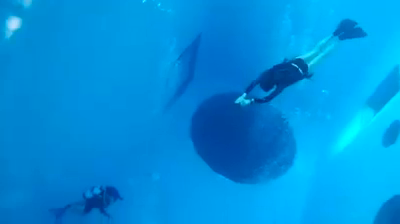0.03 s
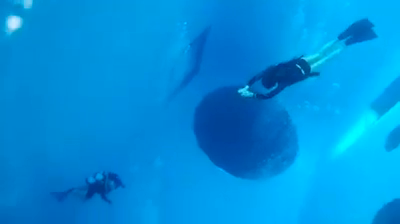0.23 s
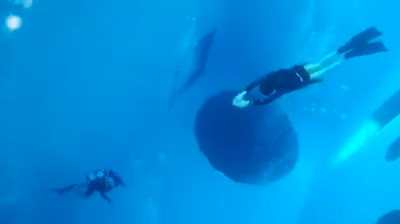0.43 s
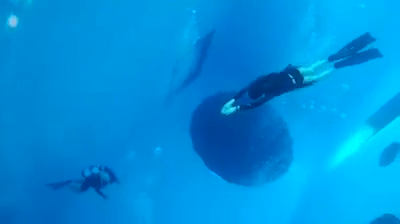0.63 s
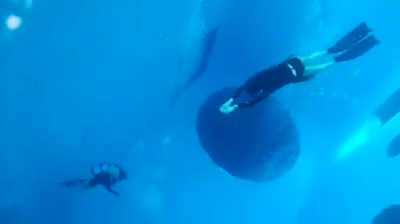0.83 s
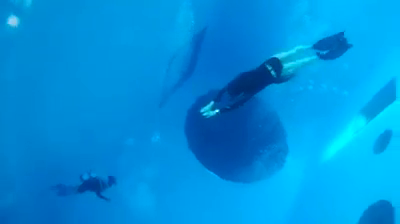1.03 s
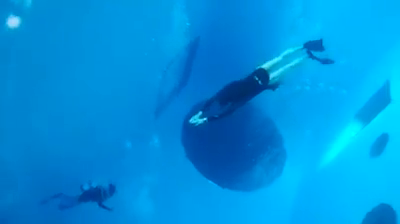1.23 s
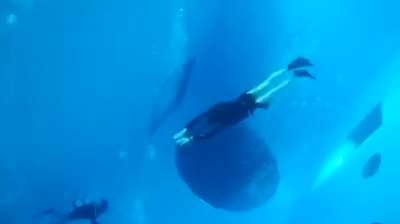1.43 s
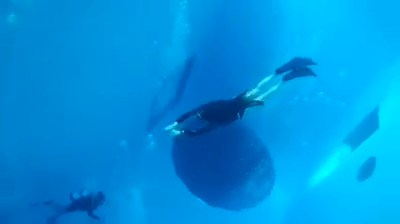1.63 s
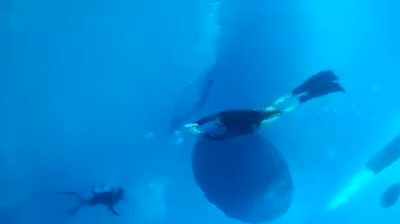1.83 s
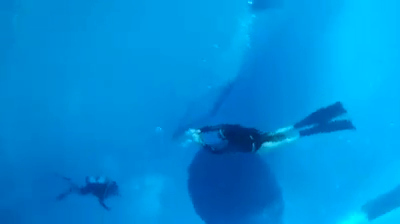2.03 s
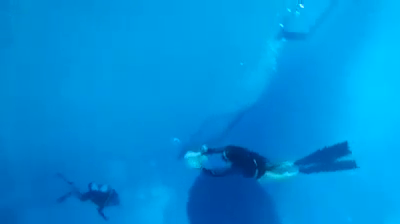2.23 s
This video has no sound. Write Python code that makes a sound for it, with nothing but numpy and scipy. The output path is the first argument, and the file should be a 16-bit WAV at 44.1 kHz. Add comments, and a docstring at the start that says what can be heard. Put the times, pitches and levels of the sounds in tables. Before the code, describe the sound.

Muffled underwater bubbling swells and eases, heard from inside a waterproof camera case in a deep pool. Larger bubbles pop nearby and tiny ones tick over a low rumble, with two faint clicks and two soft bumps midway.

```python
"""Deep in a pool, heard inside a waterproof camera housing. The sound opens abruptly on water
gurgling in slow surges: a swarm of small bubbles near 550 Hz, over a low rumble and faint hiss.
From 0.2 s a few larger bubbles ring close by and small ones tick on the housing. The swarm peaks
at 0.8 s; then the housing clicks and is softly bumped, twice each, before the surges ease off."""
import sys
import numpy as np
from scipy.fft import rfft, irfft, next_fast_len
from scipy.io import wavfile
from scipy.ndimage import uniform_filter1d, map_coordinates

SR = 44100
rng = np.random.default_rng(int(sys.argv[2]) if len(sys.argv) > 2 else 0)


def wrap_up_sound(samples):
    """Save the sound to the file named by the first command line argument, as 16-bit audio."""
    columns = np.atleast_2d(samples).T
    # keep every value between -1 and 1, then stretch to whole-number steps
    tamed = np.clip(columns, -1, 1)
    steps = np.round(tamed * 32767).astype(np.int16)
    wavfile.write(sys.argv[1], SR, steps)


N = 101429

# surges of the bubble swarm: t/s, level/dB
SWARM_LEVEL = [(.1, -46), (.19, -45), (.255, -36.5), (.29, -39), (.34, -35.5), (.37, -44), (.4, -37.5),
               (.57, -35), (.64, -38), (.72, -36.5), (.8, -30.5), (.87, -36.5), (.95, -42), (1.07, -34.5),
               (1.2, -38.5), (1.31, -40.5), (1.41, -42), (1.51, -36), (1.6, -40.5), (1.67, -36),
               (1.75, -36), (1.79, -38.5), (1.84, -38), (1.92, -40.5), (2.1, -44.5), (2.19, -41.5),
               (2.3, -43)]
# push of the water on the housing: t/s, level/dB
RUMBLE_LEVEL = [(.1, -67.5), (.5, -59), (.67, -49), (.85, -51.5), (.98, -48), (1.07, -45.5), (1.17, -52),
                (1.35, -49.5), (1.66, -52), (1.8, -45), (1.92, -50), (2.0, -47.5), (2.1, -54), (2.3, -51)]
# flow along the housing: t/s, level/dB
FLOW_LEVEL = [(0.1, -55.5), (0.31, -49.5), (0.47, -51.5), (0.82, -46.5), (.95, -50), (1.08, -47),
              (1.35, -54.5), (1.65, -52.5), (1.75, -45), (2.06, -55.5), (2.19, -50), (2.3, -51)]
# large bubbles nearby: t/s, level/dB, f/Hz, hold/s, initial glide/(octave/s)
LARGE_BUBBLES = [(0.2269, -19, 544, 0.0033, 8.5), (0.2345, -21.5, 474, .022, 3.5),
                 (0.267, -32, 650, 0.029, -1.5), (0.388, -29.5, 594, 0.013, -2.5),
                 (0.414, -30, 443, 0.01, 1), (0.44, -30.5, 547, 0.028, 0), (0.562, -39.5, 564, .015, -5),
                 (0.735, -28, 460, 0.024, 2), (0.758, -22.5, 517, 0.0078, 5),
                 (0.7706, -17.5, 536.7, 0.022, 2), (.976, -38, 540, 0.0024, 2), (.995, -33, 509, 0.049, -2),
                 (1.053, -29, 592, 0.0069, 6), (1.071, -32, 612, 0.013, 3), (1.083, -35, 426, 0.021, 3.5),
                 (1.115, -31, 556, .012, 5.5), (1.158, -34, 549, 0.019, -2.5),
                 (1.227, -25.5, 500, 0.0035, -8), (1.33, -29, 536, 0.0047, -14),
                 (1.448, -34.5, 603, 0.021, -8), (1.487, -26, 555, 0.014, 5.5),
                 (1.508, -28.5, 575, 0.024, 2.5), (1.672, -35.5, 569.7, 0.079, -1),
                 (1.742, -30.5, 532, 0.0042, -8), (1.832, -31, 698, 0.009, 0), (1.895, -33, 555, 0.0017, 8),
                 (2.129, -34.5, 563, .02, 1.5), (2.19, -32, 607, 0.012, 0),
                 (2.276, -30.5, 616, 0.0039, -16)]
# small bubbles on the housing: t/s, level/dB, f/Hz, hold/s, splash re ping/dB
BUBBLE_TICKS = [(0.263, -49, 1400, 0.011, -14), (0.289, -42, 1140, 0.0035, -10.5),
                (0.2922, -35, 1896, 0.002, -10), (.4166, -50, 1380, 0.0035, -15),
                (0.471, -49, 1880, .002, -1.5), (0.528, -45, 1080, .004, -16),
                (0.784, -41, 1600, 0.003, -1.5), (.8302, -38.5, 1900, 0.0038, -22),
                (1.12, -48.5, 1940, 0.0076, -6.5), (1.396, -50, 1270, .004, -4),
                (1.689, -38, 1770, 0.0022, -11.5), (1.825, -49.5, 2150, 0.0079, 1),
                (2.15, -56.5, 1900, 0.021, -5), (2.2002, -51.5, 1920, 0.005, -0.5)]
# soft pushes on the housing: t/s, level/dB
HOUSING_BUMPS = [(0.944, -35.5), (1.415, -29.5)]
# sharp clicks of the housing: t/s, level/dB
HOUSING_CLICKS = [(0.9108, -54.5), (1.1392, -40.5)]
# pass band of the housing: f/Hz, level/dB
HOUSING_BAND = [(100, -13.5), (250, -7), (350, -5.5), (450, -2), (560, 0), (660, 1), (770, -1.5), (860, -5),
                (980, -28.5), (1300, -22.5), (2500, -39)]
# noise spectra: f/Hz, level/dB
HISS_SPECTRUM = [(300, 1), (3000, 0.5), (4800, 7), (5300, -15.5), (6000, 4), (7800, 1), (8600, 6.5),
                 (9500, -3), (11000, -14.5), (11900, -18), (12400, 3.5), (14500, -1.5)]
FIZZ_SPECTRUM = [(400, -41), (900, 6.5), (1200, -4.5), (1450, 0.5), (1700, -11), (1950, 1.5), (2400, -9.5),
                 (3200, -9.5), (4600, -21.5), (7000, -33.5), (15000, -75)]
RUMBLE_SPECTRUM = [(10, 7), (22, 2.5), (50, 5.5), (70, -13.5), (110, -21.5), (300, -64.5)]
WASH_SPECTRUM = [(30, -9), (70, 0.5), (115, -2.5), (131, 0), (150, -1), (220, -0.5), (300, -2), (450, -5),
                 (800, -13), (1500, -61)]
CLICK_SPECTRUM = [(300, -11.5), (1100, 5.5), (1900, 10), (2600, -2.5), (3900, -1.5), (5000, -13),
                  (8000, -14.5), (14000, -29.5)]
SPLASH_SPECTRUM = [(300, -47.5), (1000, 0), (2000, -1), (2800, -9.5), (5200, -26.5), (6200, -18.5),
                   (7500, -31), (10000, -23.5), (11000, -44), (15000, -49)]

BUBBLE_ATTACK_S = 0.0014


def amp(db):
    """Decibels to gain."""
    return 10 ** (np.asarray(db) / 20)


def unit(x):
    """Scale to rms 1."""
    return x / np.sqrt(np.mean(x ** 2) + 1e-20)


def curve(rows):
    """One value per sample from (t/s, value) points."""
    return np.interp(np.arange(N) / SR, *np.transpose(rows))


def wobble(knots_per_s):
    """Smooth random curve."""
    knots = rng.standard_normal(int(N * knots_per_s / SR) + 4)
    return map_coordinates(knots, [np.arange(N) * knots_per_s / SR])


def filtered(x, response):
    """Apply the gain response(f/Hz)."""
    size = next_fast_len(N + SR // 2)
    return irfft(rfft(x, size) * response(np.fft.rfftfreq(size, 1 / SR)), size)[:N]


def coloured(x, spectrum):
    """Shape x by (f/Hz, level/dB) points on a log axis; rms 1."""
    points_hz, db = np.transpose(spectrum)
    return unit(filtered(x, lambda hz: amp(np.interp(np.log(hz + 1), np.log(points_hz + 1), db))))


def noise(spectrum):
    """Shaped noise; rms 1."""
    return coloured(rng.standard_normal(N), spectrum)


def since(onset_s):
    """Seconds since onset, zero before."""
    return np.maximum(np.arange(N) / SR - onset_s, 0)


def envelope(t, attack_s, hold_s, t60_s):
    """Quick rise, hold, exponential release."""
    return (1 - np.exp(-t / attack_s)) * amp(-60 * np.maximum(t - hold_s, 0) / t60_s)


def evened(x, share=0.6, window_s=0.04):
    """Take out a share of the chance swells; rms 1."""
    power = uniform_filter1d(x ** 2, int(window_s * SR))
    power = np.abs(uniform_filter1d(power, int(window_s * SR / 2)))
    return unit(x / (power + 1e-6) ** (share / 2))


def bubble_cloud(per_s, centre_hz, spread, t60_cycles, size_db, rise=0.1):
    """Bubbles of random time, pitch and size, each a short rising ring; rms 1."""
    when, pitch, size = rng.random((int(per_s * N / SR), 3)).T
    logistic = np.log((pitch + 1e-3) / (1 - pitch + 1e-3))
    hz = centre_hz * np.exp(spread * logistic / 2)[:, None]
    gain = amp(-size_db * np.log(1 - 0.97 * size))[:, None]
    t = np.arange(SR // 16) / SR
    t60_s = t60_cycles / hz
    phase = 2 * np.pi * hz * t * (1 + rise * t / t60_s / 2)
    rings = gain * envelope(t, BUBBLE_ATTACK_S, 0, t60_s) * np.sin(phase)
    index = (when * N).astype(int)[:, None] + np.arange(len(t))
    return unit(np.bincount(index.ravel(), rings.ravel(), N)[:N])


def fizz(froth_db=-60, flicker_db=0.95, pings_db=-62, hiss_db=-66.5):
    """The finest bubbles follow surge and flow, over a nearly steady hiss."""
    surge_db = curve(SWARM_LEVEL) - curve(SWARM_LEVEL).mean()
    flow_db = curve(FLOW_LEVEL) - curve(FLOW_LEVEL).mean()
    froth = amp(froth_db + flicker_db * wobble(140)) * noise(FIZZ_SPECTRUM)
    pings = bubble_cloud(per_s=500, centre_hz=1449, spread=0.223, t60_cycles=74, size_db=5.5)
    hiss = amp(hiss_db + 0.26 * surge_db) * noise(HISS_SPECTRUM)
    return amp(0.64 * surge_db + 0.22 * flow_db) * (froth + amp(pings_db) * pings) + hiss


def rumble(wash_gain_db=0.5):
    """Water presses on the housing and washes along it."""
    push = amp(curve(RUMBLE_LEVEL)) * evened(noise(RUMBLE_SPECTRUM))
    wash = amp(wash_gain_db + curve(FLOW_LEVEL)) * noise(WASH_SPECTRUM)
    return push + wash


def bumps(hz=35.5, width_s=0.012):
    """Water bumps the housing: soft low pulses."""
    out = np.zeros(N)
    for centre_s, db in HOUSING_BUMPS:
        t = np.arange(N) / SR - centre_s
        out += amp(db) * np.sin(2 * np.pi * hz * t) * np.exp(-(t / width_s) ** 2)
    return out


def clicks():
    """The housing clicks: sharp noise bursts."""
    gain = np.zeros(N)
    for onset_s, db in HOUSING_CLICKS:
        gain += amp(db) * envelope(since(onset_s), attack_s=0.00035, hold_s=0.003, t60_s=0.012)
    return gain * noise(CLICK_SPECTRUM)


def ticks():
    """Small bubbles burst on the housing: ping plus splash."""
    out, splash = np.zeros(N), noise(SPLASH_SPECTRUM)
    for onset_s, db, hz, hold_s, splash_db in BUBBLE_TICKS:
        t = since(onset_s)
        burst = np.sin(2 * np.pi * hz * t) + amp(splash_db) * splash
        out += amp(db) * envelope(t, BUBBLE_ATTACK_S, hold_s, t60_s=0.026) * burst
    return out


def large_bubbles(roughness=0.1):
    """Large bubbles ring as they tear loose, gliding slightly in pitch."""
    out = np.zeros(N)
    for onset_s, db, hz, hold_s, octaves_per_s in LARGE_BUBBLES:
        t = since(onset_s)
        phase = 2 * np.pi * hz * t * (1 + np.log(2) * octaves_per_s * t / 2)
        out += amp(db) * envelope(t, BUBBLE_ATTACK_S, hold_s, t60_s=0.022) * np.sin(phase)
    return out * (1 + roughness * wobble(250))


def swarm():
    """Surging mass of small bubbles, heard through the housing's pass band."""
    mass = bubble_cloud(per_s=1600, centre_hz=590.3, spread=0.2998, t60_cycles=38.3, size_db=1)
    return amp(curve(SWARM_LEVEL)) * evened(coloured(mass, HOUSING_BAND))


def scene():
    """Sum of all sources, mono."""
    return (swarm() + large_bubbles() + ticks() + clicks() + bumps() + rumble() + fizz())[None]


def record(dry):
    """Abrupt opening, then a hard band limit."""
    start_s, fade_s, top_hz = 0.093, 0.002, 14700
    opened = dry[0] * np.clip(since(start_s) / fade_s, 0, 1)
    return filtered(opened, lambda hz: hz < top_hz)[None]


dry = scene()
out = record(dry)
wrap_up_sound(out)
```